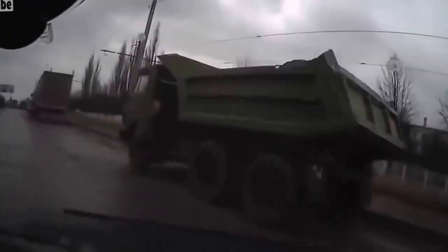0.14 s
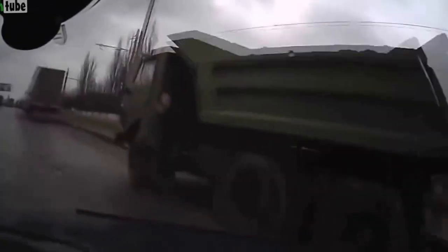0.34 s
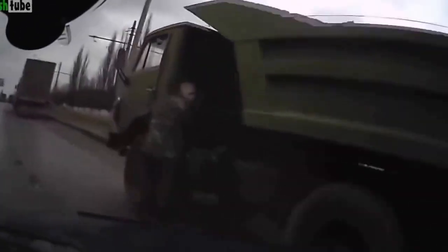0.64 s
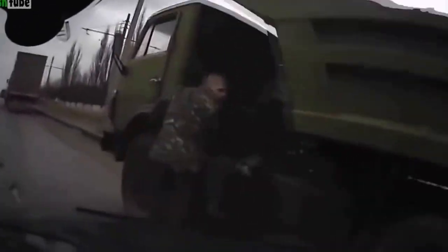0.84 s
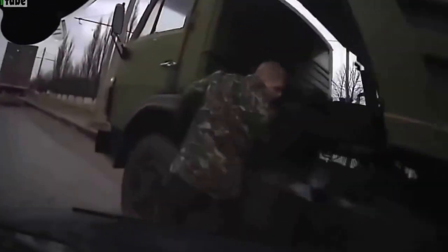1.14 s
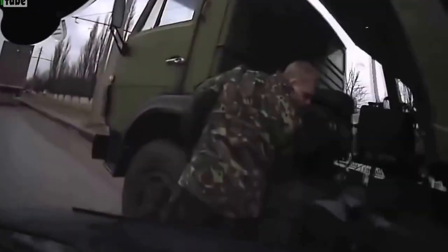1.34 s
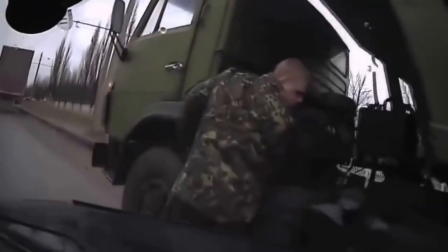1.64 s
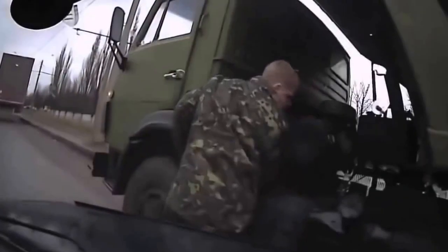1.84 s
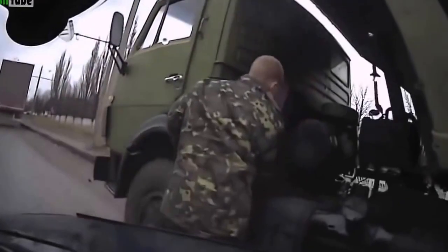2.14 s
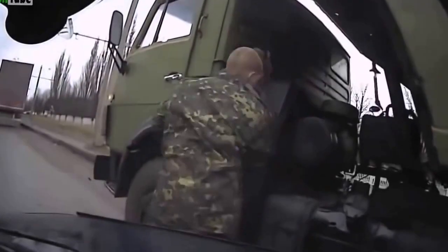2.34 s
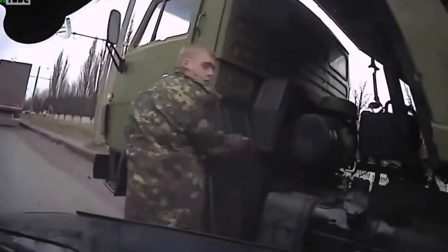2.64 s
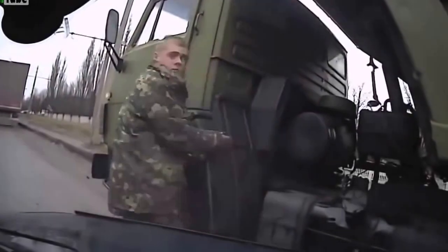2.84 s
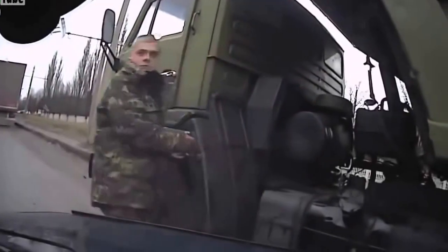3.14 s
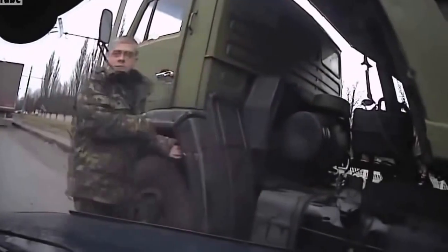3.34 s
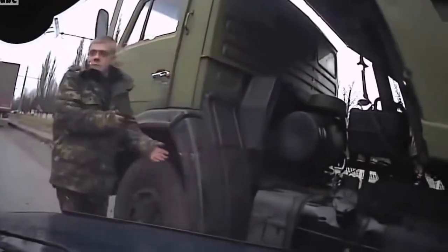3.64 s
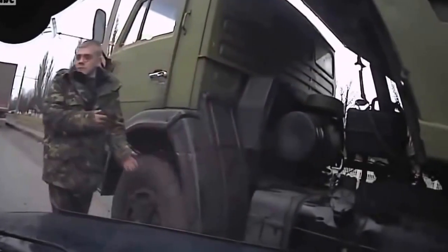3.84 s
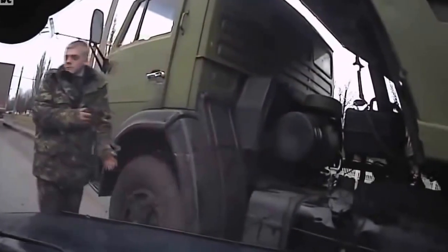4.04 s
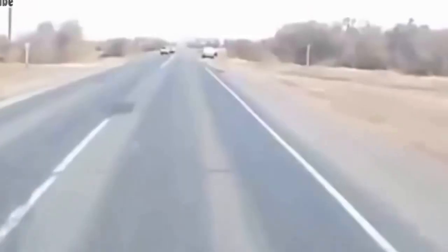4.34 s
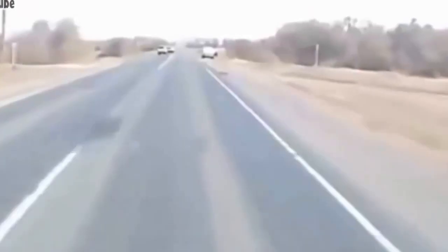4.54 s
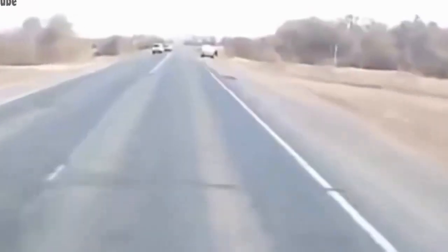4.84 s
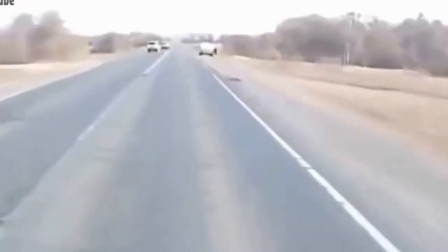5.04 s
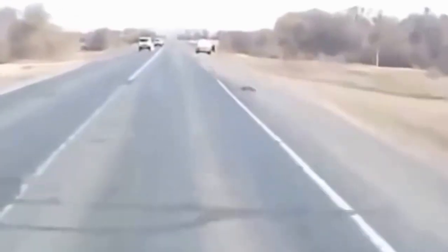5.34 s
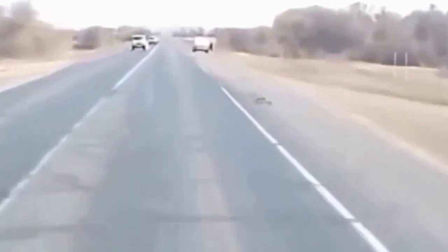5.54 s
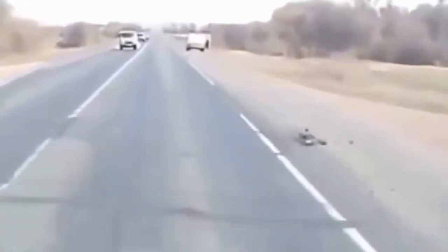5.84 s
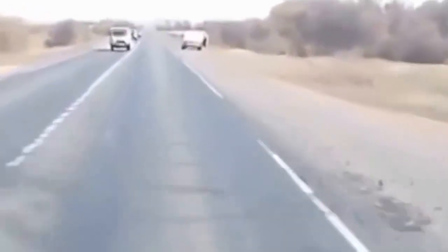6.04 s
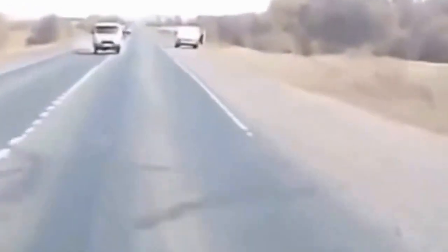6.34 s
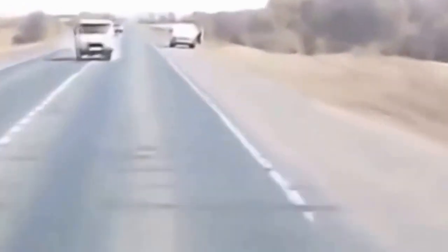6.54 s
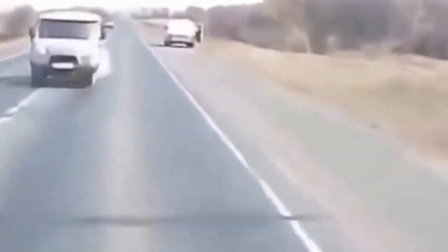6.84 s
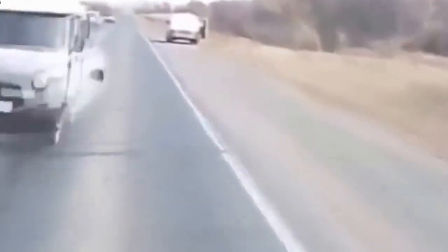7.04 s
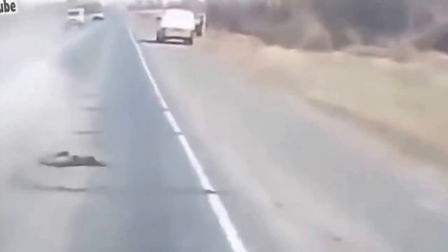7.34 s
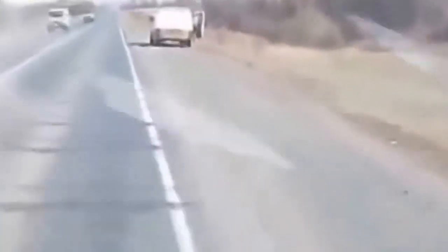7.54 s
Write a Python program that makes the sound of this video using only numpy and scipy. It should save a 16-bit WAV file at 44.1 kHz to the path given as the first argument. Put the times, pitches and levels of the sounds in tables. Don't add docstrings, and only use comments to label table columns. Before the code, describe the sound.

Small plastic knocks, clicks and squeaks in a quiet parked car, then an abrupt cut to overloaded highway roar and a violent distorted crash.

```python
import sys
import numpy as np
from scipy import signal
from scipy.io import wavfile
from scipy.ndimage import uniform_filter1d

SR = 44100
rng = np.random.default_rng(int(sys.argv[2]) if len(sys.argv) > 2 else 0)


def convert_level_to_amplitude(level_db):
    exponent = np.asarray(level_db, float) / 20
    return 10 ** exponent


def unload_audio(sound):
    columns = np.transpose(np.atleast_2d(sound))
    steps = np.round(np.clip(columns, -1, 1) * 32767)
    wavfile.write(sys.argv[1], SR, steps.astype(np.int16))


N = 339570
TIME_S = np.arange(N) / SR

CUT_S, IMPACT_S = 4.3031, 5.778
AT_REST, ON_ROAD = slice(0, int(4.31 * SR)), slice(int(4.2 * SR), N)


def rms_one(x):
    return x / np.sqrt(np.mean(x ** 2) + 1e-20)


def evened(x, size):
    return x / np.sqrt(uniform_filter1d(x ** 2, size=size) + 1e-9)


def in_time(rows):
    return np.interp(TIME_S, *np.transpose(rows))


def swell(centre_s, spread_s, db, order=2):
    return convert_level_to_amplitude(db) * np.exp(-np.abs((TIME_S - centre_s) / spread_s) ** order / 2)


def after(start_s, fall_s):
    return (TIME_S >= IMPACT_S) * np.exp(-np.maximum(TIME_S - start_s, 0) / fall_s)


def drift(rate, part=slice(None)):
    knots = rng.standard_normal(N // 64 + 2)
    r = np.exp(-128 * np.pi * rate / SR)
    slow = rms_one(signal.lfilter([1], [1, -2 * r, r * r], knots))
    return np.interp(np.arange(N)[part] / 64, np.arange(len(slow)), slow)


def band(x, low_hz, high_hz, order=2):
    return signal.sosfilt(signal.butter(order, [low_hz, high_hz], "band", fs=SR, output="sos"), x)


def resonance(x, hz, width_hz):
    r = np.exp(-np.pi * width_hz / SR)
    poles = [1, -2 * r * np.cos(2 * np.pi * hz / SR), r * r]
    return signal.lfilter([(1 - r * r) / 2, 0, (r * r - 1) / 2], poles, x)


def coloured(spectrum, part, patchy_db, lumps_db, rate):
    hz, level_db = np.transpose(spectrum)
    edges = np.geomspace(hz[0], hz[-2], int(3 * np.log2(hz[-2] / hz[0])) + 2)
    white, out = rng.standard_normal((2, part.stop - part.start)), np.zeros(N)
    for k, (low, high) in enumerate(zip(edges, edges[1:])):
        centre_db = np.interp(np.log(low * high) / 2, np.log(hz), level_db)
        flicker = convert_level_to_amplitude(centre_db + patchy_db * drift(rate, part))
        out[part] += flicker * band(white[k % 2], low, high)
    out[part] = rms_one(out[part] * convert_level_to_amplitude(lumps_db * drift(rate * 2, part)))
    return out


def bursts(times, level_db, t60):
    out, t = np.zeros(N), np.arange(int(.1 * SR)) / SR
    for s, db in zip(times, level_db):
        i = int(s * SR)
        contact = convert_level_to_amplitude(db - 60 * t / t60) * np.minimum(t / .001, 1)
        out[i:i + len(t)] += contact[:N - i]
    return out


# (time [s], level [dB])
RIDE_FORCE = [(4.3, -6.5), (4.33, 1), (4.6, -0.5), (5.0, -0.5), (5.55, -0.5), (5.7, 3.5), (5.77, 4.5),
              (5.79, 15), (5.9, 12), (6.2, 11.5), (6.55, 6.5), (6.66, 2.5), (6.95, 2.5), (7.28, 0.5),
              (7.33, 4), (7.5, 2), (7.64, 4.5), (7.7, 4.5)]


def ride_force_db():
    return in_time(RIDE_FORCE)


# (frequency [Hz], level [dB per Hz])
RUMBLE_SPECTRUM = [(8.8, -23), (15, -0.5), (19, -12.5), (32, -2), (97, -12), (140, -21.5), (170, -34),
                   (220, -61), (370, -120)]
# (frequency [Hz], level [dB per Hz])
ROAR_SPECTRUM = [(88, -19), (150, -6), (182, -1), (273, -6.5), (306, 6), (345, -5.5), (642, -1.5),
                 (900, -10), (1170, -33.5), (1980, -120)]
# (frequency [Hz], level [dB per Hz])
METAL_SPECTRUM = [(500, -31), (850, 0.5), (939, 8), (1490, -1.5), (2010, -14.5), (2400, -23.5),
                  (3120, -36.5), (5280, -120)]


def road_roar():
    force_db = ride_force_db()
    rumble = coloured(RUMBLE_SPECTRUM, ON_ROAD, patchy_db=-0.5, lumps_db=-2.5, rate=7.3)
    roar = coloured(ROAR_SPECTRUM, ON_ROAD, patchy_db=1.0, lumps_db=2.0, rate=13.0)
    metal = coloured(METAL_SPECTRUM, ON_ROAD, patchy_db=0.5, lumps_db=2.5, rate=48)
    sprung = 1.9 * np.tanh(rumble / 1.7)
    slam = swell(centre_s=5.86, spread_s=0.042, db=-4.5)
    return convert_level_to_amplitude(-16.5) * sprung + (convert_level_to_amplitude(-20 + 0.43 * force_db) + slam) * roar + convert_level_to_amplitude(-27 + force_db) * metal


# (time [s], peak level [dB])
ROAD_TICKS = [(4.329, -28), (4.3525, -24.5), (4.3695, -29), (4.3894, -40), (4.4465, -37), (4.464, -37),
              (4.538, -39), (4.579, -37), (4.5974, -35), (4.613, -33), (4.644, -39), (4.729, -39),
              (4.747, -38), (4.7583, -26.5), (4.811, -30.5), (4.857, -32), (4.939, -35), (4.9495, -28.5),
              (5.0145, -35), (5.053, -26), (5.1282, -23), (5.151, -30), (5.1846, -31), (5.2034, -25),
              (5.235, -32), (5.253, -26), (5.2939, -31), (5.326, -36), (5.3594, -36), (5.4038, -33),
              (5.4782, -32), (5.577, -34), (5.5989, -33), (5.6308, -33), (5.6657, -32)]
# (time [s], peak level [dB])
COLLISION_BLOWS = [(5.8052, -3), (5.8527, -1), (5.8798, -5), (5.8943, -8.5), (5.953, -7.5), (5.976, -2),
                   (6.033, -13.5), (6.074, -13.5), (6.098, -16), (6.158, -15.5), (6.245, -21),
                   (6.2627, -22.5), (6.352, -17.5), (6.428, -20.5), (6.4513, -26), (6.5012, -25),
                   (6.519, -21.5), (6.556, -24)]
# (time [s], peak level [dB], dull ring relative to peak [dB])
TORN_FLAPS = [(6.7556, -31, -3), (6.775, -28, -3), (6.831, -24, -15), (6.8535, -16, 10),
              (6.9325, -16.5, 12), (7.003, -30, -3), (7.057, -29, -2), (7.081, -28, -7), (7.123, -17, -4),
              (7.3108, -16.5, 3), (7.324, -27, 9), (7.3406, -14, -1), (7.352, -24, -3), (7.376, -14, 4),
              (7.3944, -25, 6), (7.4, -26, -3), (7.4136, -22, -3), (7.419, -21, 4), (7.443, -25, -3),
              (7.4505, -20, 6), (7.468, -24, -3), (7.4779, -19, 7), (7.492, -28, -3), (7.5075, -17, 10),
              (7.542, -23, -6), (7.5473, -22, -14), (7.5687, -27, -3), (7.606, -29, -3), (7.5875, -15.5, 2),
              (7.627, -17, 9), (7.633, -18, 5), (7.647, -23, -5), (7.671, -20, 7), (7.68, -22, 4),
              (7.6865, -15, 9), (7.692, -19, 3)]


def rattles():
    white, buzz, ring = rng.standard_normal(N), np.zeros(N), np.zeros(N)
    ticks = [(*row, -7) for row in ROAD_TICKS]
    blows = [(*row, -1) for row in COLLISION_BLOWS]
    groups = [(ticks, 0.024, -5.5), (blows, 0.038, -9), (TORN_FLAPS, 0.02, -6)]
    for rows, t60, buzz_db in groups:
        s, db, dull_db = np.transpose(rows)
        buzz = buzz + bursts(s, db + buzz_db, t60)
        ring = ring + bursts(s, db + dull_db - 5.5, t60 * 1.4)
    crack = 0.6 * rms_one(band(white, 1900, 6400)) + 0.2 * rms_one(band(white, 6000, 9000))
    high_rings = 1.38 * rms_one(resonance(white, 3770, 1000)) + 0.24 * rms_one(resonance(white, 6300, 1500))
    dull = evened(resonance(resonance(white, 1720, 400), 1720, 600), size=200)
    return 1.5 * evened(crack + high_rings, size=100) * buzz + dull * ring


def bent_panel():
    growth = np.clip((TIME_S - IMPACT_S) / (7.2 - IMPACT_S), 0, 1)
    return convert_level_to_amplitude(-28) * rms_one(resonance(rng.standard_normal(N), 560, 130)) * growth


# (frequency [Hz], level [dB per Hz])
WIND_SPECTRUM = [(1350, -36), (2300, -1), (2640, 1.5), (3120, -3), (3860, -0.5), (4350, -9), (5300, -19),
                 (9090, -21), (11800, -55.5), (20000, -120)]
# (frequency [Hz], level [dB per Hz])
TEARING_SPECTRUM = [(1060, -42.5), (1800, 0), (2950, -4), (3790, -1), (4280, -6.5), (5770, -17),
                    (6480, -17), (8160, -24.5), (9090, -22), (11800, -56), (20000, -120)]


def wind_and_tearing():
    since = TIME_S - IMPACT_S
    wind = coloured(WIND_SPECTRUM, ON_ROAD, patchy_db=3.0, lumps_db=3.0, rate=38)
    tearing = coloured(TEARING_SPECTRUM, ON_ROAD, patchy_db=2.0, lumps_db=1.3, rate=39)
    whistle = rms_one(band(rng.standard_normal(N), 4250, 5050, order=4))
    nearing = np.clip(1 + since / (IMPACT_S - 5.05), 0, 1)
    bow_wave = swell(centre_s=5.78, spread_s=0.055, db=-37)
    wind_gain = convert_level_to_amplitude(-42 + 8.5 * since) + bow_wave
    air = wind_gain * wind + convert_level_to_amplitude(-49) * np.sqrt(nearing) * whistle
    return np.where(since < 0, air, convert_level_to_amplitude(-39.5 + 1.48 * ride_force_db()) * tearing)


def gravel():
    per_s = 30
    draws = rng.random((int(per_s * (N / SR - CUT_S)), 2))
    s = CUT_S + (np.arange(len(draws)) + draws[:, 0]) / per_s
    s = np.clip(s, CUT_S + .03, N / SR - .002)
    peak_db = -41 + 0.6 * ride_force_db()[(s * SR).astype(int)] - 12 * draws[:, 1]
    return rms_one(band(rng.standard_normal(N), 1800, 5000)) * bursts(s, peak_db, 0.015)


def highway():
    return road_roar() + rattles() + bent_panel() + wind_and_tearing() + gravel()


# (frequency [Hz], level [dB], t60 [s])
TRIM_MODES = [(772, -4, 0.03), (1000, 3.5, 0.086), (1230, -6.5, 0.047), (1540, -7, 0.049),
              (1840, -3.5, 0.041), (1970, -15, 0.041)]
# (time [s], peak level [dB], snap relative [dB], thump relative [dB])
KNOCKS = [(0.035, -11, -10, -17), (0.085, -19, -6.5, -32), (0.185, -34, 7, -13), (0.193, -18, -8, -12.5),
          (0.281, -25, -8, -5), (0.441, -29, -25, -22), (0.461, -29, -21, -10), (0.482, -22, -26, -12),
          (0.589, -12, -10.5, -1.5), (0.88, -29, -27, -6), (1.006, -27, -31, 0), (1.137, -31, -5, -21),
          (1.508, -31, -4, -25), (1.53, -32, -6, -25), (1.545, -32, -13, -20), (1.556, -31, -20, -2),
          (1.563, -29, 3, -25), (1.569, -29, -3.5, -18), (1.597, -32, -11, -25), (1.635, -33, -2, -25),
          (1.655, -23.5, -1, -15), (1.682, -22.5, -26, -40), (1.699, -26, -22, -26),
          (1.749, -27.5, -15, -18), (1.921, -29, -14, -30), (1.943, -39, 1, -30), (2.012, -33, -20, -30),
          (2.028, -24, -24, -34), (2.043, -28, -13, -28), (2.819, -34, -14, -35), (2.843, -36, -12, -30),
          (2.856, -36, -12, -30), (2.88, -36, -14, -30), (2.964, -45, 13.5, -16), (2.971, -39, 9.5, -20),
          (3.347, -26, -13, -11), (3.358, -36, 0, -25)]
# (time [s], peak level [dB], snap relative [dB], thump relative [dB])
CLICKS = [
    (0.0, -16.5, -11, -11),
    (1.34, -25.5, -9.5, -28),
    (1.452, -36, -4, -18),
    (1.898, -26, -14, -34),
    (1.906, -30, -14, -30),
    (1.958, -32, -14, -20.5),
    (2.746, -17, -6, -13),
    (2.871, -48, 5.5, -25),
    (1.661, -34, 1, -25),
]


def knock(noise, t, t60, snap_hz, thump_hz):
    blow = 1.5 * np.exp(-((t - .0008) / 0.00013) ** 2)
    crackle = noise * convert_level_to_amplitude(-60 * np.maximum(t - .006, 0) / t60) * np.minimum(t / 0.00066, 1)
    hit = crackle + blow
    modes = sum(convert_level_to_amplitude(db) * resonance(hit, hz, 7.8 / fall_s + 90) for hz, db, fall_s in TRIM_MODES)
    body = rms_one(band(modes, 735, 1800)) + 0.66 * rms_one(band(crackle, 1220, 2850))
    crack = crackle * convert_level_to_amplitude(-600 * t)
    snap = resonance(crack, snap_hz, 600) + 0.28 * resonance(crack, snap_hz * 1.34, 450)
    snap = snap + 0.21 * band(crack, 2400, 6000) + 0.1 * band(crack, 4300, 14000)
    thump = band(hit, thump_hz / 1.25, thump_hz * 1.36) + .3 * band(hit, 78, 233)
    return body, snap, thump


def knocks():
    out, t = np.zeros(N), np.arange(int(.15 * SR)) / SR
    kinds = [(KNOCKS, 3310, 425, 1), (CLICKS, 4740, 336, 0.76)]
    for rows, snap_hz, thump_hz, shorter in kinds:
        for s, db, snap_db, thump_db in rows:
            t60 = 0.047 * np.exp(0.08 * (db + 22)) * shorter
            layers = knock(rng.standard_normal(len(t)), t, t60, snap_hz, thump_hz)
            levels_db = db - 1.5, db + snap_db - 0.5, db + thump_db - 1.5
            i = int(s * SR)
            out[i:i + len(t)] += sum(convert_level_to_amplitude(d) * x / np.abs(x).max() for x, d in zip(layers, levels_db))
    return out


# (start [s], end [s], pitch [Hz], width [Hz], level [dB])
RUBS = [(.719, .752, 1290, 28, -27.5), (.395, .415, 1270, 69, -30), (0.4, 0.47, 432, 34, -41.5),
        (1.6, 1.78, 1970, 150, -45), (1.6, 1.77, 2170, 100, -44), (1.58, 1.78, 2450, 180, -44),
        (1.62, 1.77, 1500, 500, -49), (2.28, 2.54, 4500, 900, -62), (2.964, 2.98, 2600, 350, -47),
        (2.966, 2.985, 3450, 300, -45), (3.345, 3.362, 975, 110, -38), (1.65, 1.74, 1160, 200, -40),
        (1.77, 1.92, 5600, 310, -55), (1.9, 2.05, 5550, 350, -58), (1.58, 1.71, 140, 15, -55),
        (0.87, .88, 140, 35, -52), (1.01, 1.12, 118, 30, -49.5), (1.3, 1.34, 110, 34, -46),
        (4.13, 4.25, 200, 86, -63), (.3, .335, 5100, 500, -47), (.3, 0.35, 1170, 60, -34.5)]


def squeaks():
    out = np.zeros(N)
    for start, end, hz, width_hz, db in RUBS:
        i, j = int(start * SR), int(end * SR)
        noise = rng.standard_normal(j - i + SR // 10)
        tone = resonance(resonance(noise, hz, width_hz), hz, width_hz * 2)
        envelope = np.abs(signal.hilbert(tone)) + 1e-9
        tone = (tone / envelope ** min(.6, 25 / width_hz))[i - j:]
        fade = signal.windows.tukey(j - i, min(1, .3 + width_hz / 700))
        out[i:j] += convert_level_to_amplitude(db) * rms_one(tone) * fade
    return out


def settling_boom():
    late = TIME_S - 1.32
    rock_db = np.maximum(-53 - (late > 0) * (8.5 + 15 * late), -86)
    last_sway = swell(centre_s=1.24, spread_s=0.068, db=-53)
    seat_creak = swell(centre_s=4.21, spread_s=0.081, db=-67)
    rock = uniform_filter1d(convert_level_to_amplitude(rock_db), size=4000) + last_sway + seat_creak
    white = rng.standard_normal(N)
    boom = rms_one(band(white, 79, 149, order=4)) + 0.76 * rms_one(band(white, 44, 54))
    return convert_level_to_amplitude(1.6 * drift(21)) * rock * boom


# (time [s], level [dB])
CABIN_STIR = [(0, -28), (.15, -32.5), (.45, -35.5), (.87, -41.5), (1.05, -41.5), (1.35, -50.5),
              (1.62, -40.5), (1.84, -48), (2.1, -52.5), (3.1, -52), (3.5, -49.5), (4.3, -51.5)]
# (frequency [Hz], level [dB per Hz])
PANEL_SPECTRUM = [(140, -34), (240, -8), (356, 1), (397, -4.5), (442, -1), (620, -7.5), (810, -27),
                  (1360, -120)]
# (frequency [Hz], level [dB per Hz])
CABIN_SPECTRUM = [(350, -39), (600, -7.5), (777, 3.5), (840, -2), (1010, 7), (1270, -4), (1600, -7),
                  (2080, -35), (3520, -120)]
# (frequency [Hz], level [dB per Hz])
RUSTLE_SPECTRUM = [(910, -33), (1550, -2), (2020, -1), (2310, -8), (2490, -3), (2820, -8.5), (3480, -6),
                   (3860, -10.5), (5550, -16), (6470, -23), (7700, -19), (8200, -21), (10700, -45),
                   (18000, -120)]
# (centre [s], spread [s], level [dB])
CLOTH_MOVES = [
    (1.66, 0.13, -52.5),
    (2.05, 0.58, -58),
    (3.67, 0.18, -57.5),
]


def stirring_cabin():
    stir_db = in_time(CABIN_STIR)
    above_db = stir_db + 52
    loose_db = 6 / (1 + np.exp(np.minimum((TIME_S - 2.14) / .06, 50)))
    panels = coloured(PANEL_SPECTRUM, AT_REST, patchy_db=2.5, lumps_db=1.0, rate=9.1)
    cabin = coloured(CABIN_SPECTRUM, AT_REST, patchy_db=1.0, lumps_db=1.0, rate=28)
    rustle = coloured(RUSTLE_SPECTRUM, AT_REST, patchy_db=0.5, lumps_db=1.5, rate=66)
    drone = convert_level_to_amplitude(-62.5 + 0.74 * above_db + loose_db) * panels
    debris = convert_level_to_amplitude(-55 + 0.65 * above_db) * rustle
    cloth_noise = 0.67 * rustle + 1.14 * band(rustle, 3560, 13000)
    cloth = sum(swell(*row, order=6) for row in CLOTH_MOVES) * cloth_noise
    return drone + convert_level_to_amplitude(stir_db) * cabin + debris + cloth


def car_at_rest():
    return knocks() + squeaks() + settling_boom() + stirring_cabin()


def scene():
    return np.where(TIME_S < CUT_S, car_at_rest(), highway())[None]


def low_pass(x, hz, soft_hz, leak_db, air_hz):
    soft = signal.sosfilt(signal.butter(3, soft_hz, fs=SR, output="sos"), x)
    steep = signal.sosfilt(signal.ellip(10, .5, 60, hz, fs=SR, output="sos"), soft)
    air = signal.sosfilt(signal.ellip(5, 1, 16, [hz, air_hz], "band", fs=SR, output="sos"), x)
    return steep + convert_level_to_amplitude(leak_db) * air


def rest_camera(dry):
    hiss = convert_level_to_amplitude(-96) * rms_one(band(rng.standard_normal(N), 8600, 11900, order=4))
    shifted = band(dry, 4800, 8200, order=4) * np.cos(2 * np.pi * 3900 * TIME_S)
    haze = convert_level_to_amplitude(-27) * band(shifted, 8900, 12200, order=4)
    return -0.023 + hiss + low_pass(dry, 8250, soft_hz=11000, leak_db=-28, air_hz=12100) + haze


def road_camera(dry):
    rise = int(.1 * SR)
    rail_jump = uniform_filter1d(after(IMPACT_S + .2, .2), size=rise, origin=int(rise / 3))
    top, bottom = -.07 + .22 * rail_jump, -.73
    half = (top - bottom) / 2
    drive_db = 0.5 + 0.56 * ride_force_db() + 13.5 * after(IMPACT_S, 0.053)
    pull = -0.062 - 7 * after(5.85, 0.034)
    u = convert_level_to_amplitude(drive_db) * dry / half + pull
    squashed = 1.04 * half * u / (1 + np.abs(u) ** 2.6) ** (1 / 2.6)
    busy = np.sqrt(uniform_filter1d(band(squashed, 1290, 8000) ** 2, size=800) + 1e-12)
    grit = convert_level_to_amplitude(-12.5) * busy * band(rng.standard_normal(N), 200, 5360)
    housing = squashed + grit + .5 * resonance(squashed, 3820, 330)
    housing = housing / (1 + (housing / (1.17 * half)) ** 6) ** (1 / 6)
    return (top + bottom) / 2 + low_pass(housing, 9300, soft_hz=7400, leak_db=-22.5, air_hz=13000)


def roll_off(x):
    return signal.sosfilt(signal.butter(12, 15400, fs=SR, output="sos"), x)


def record(dry):
    whine = convert_level_to_amplitude(-99) * np.sin(2 * np.pi * 11720 * TIME_S)
    joined = np.where(TIME_S < CUT_S, rest_camera(dry), road_camera(dry)) + whine
    return roll_off(joined)


dry = scene()
out = record(dry)
unload_audio(out)
```